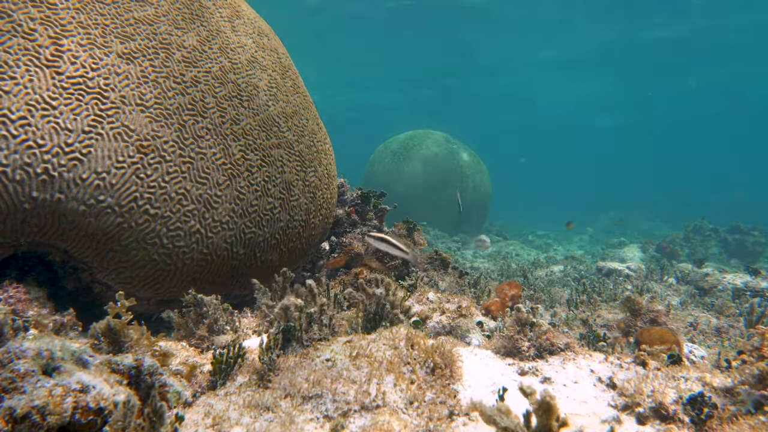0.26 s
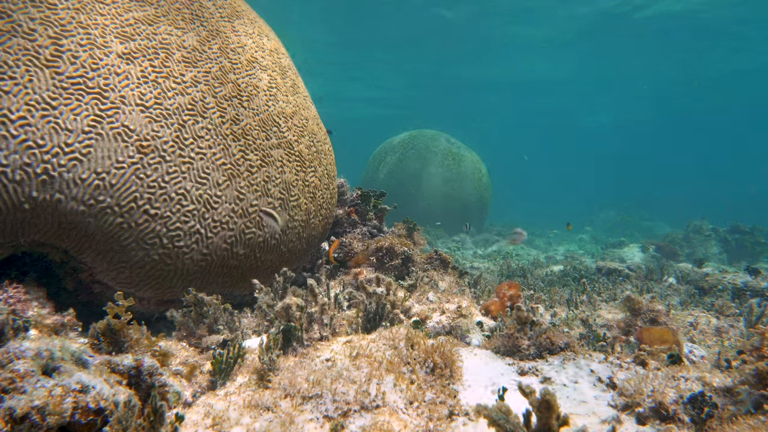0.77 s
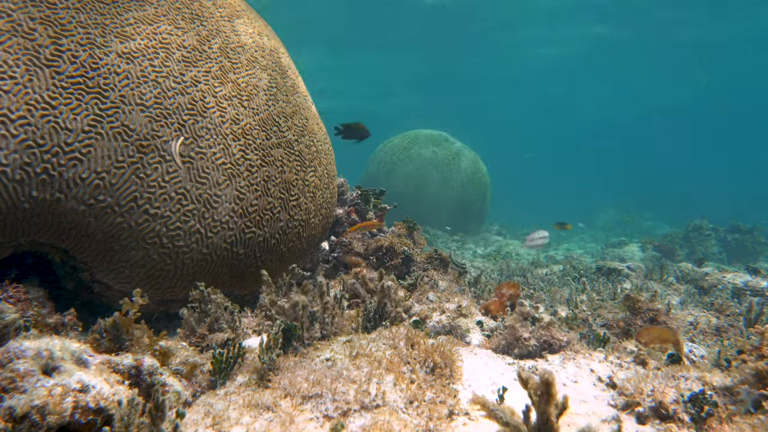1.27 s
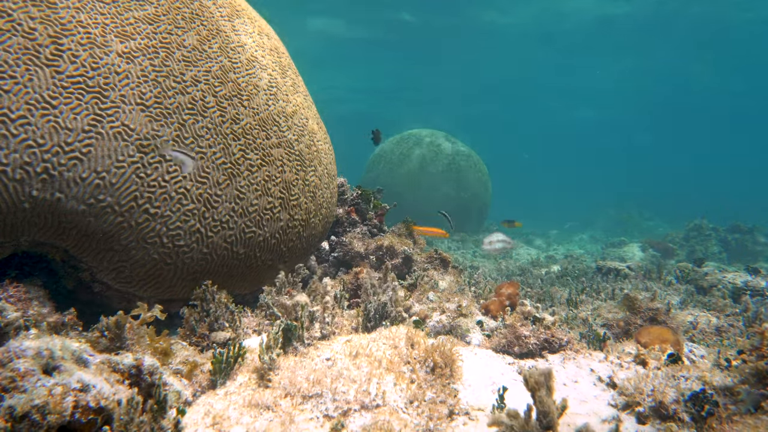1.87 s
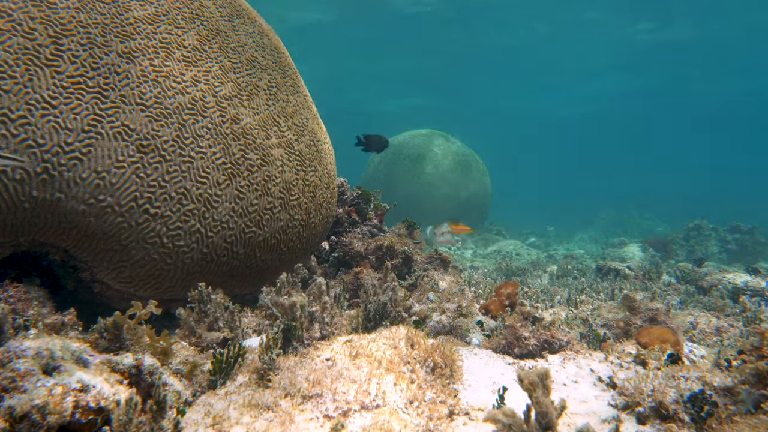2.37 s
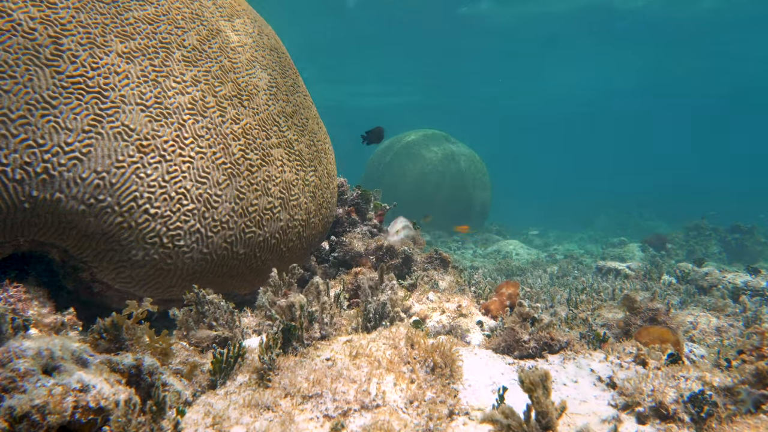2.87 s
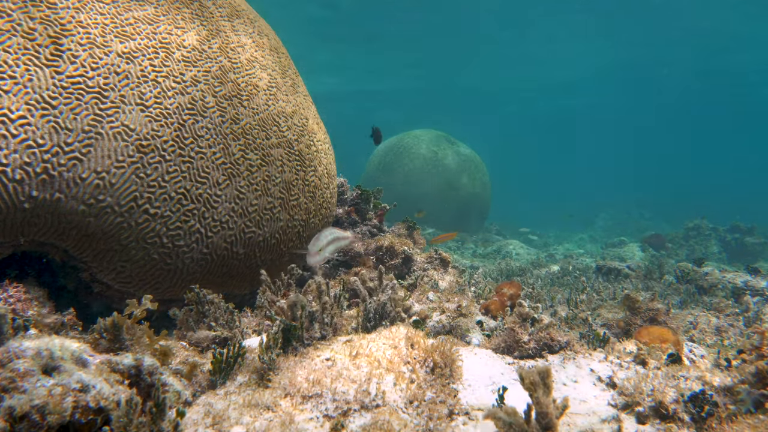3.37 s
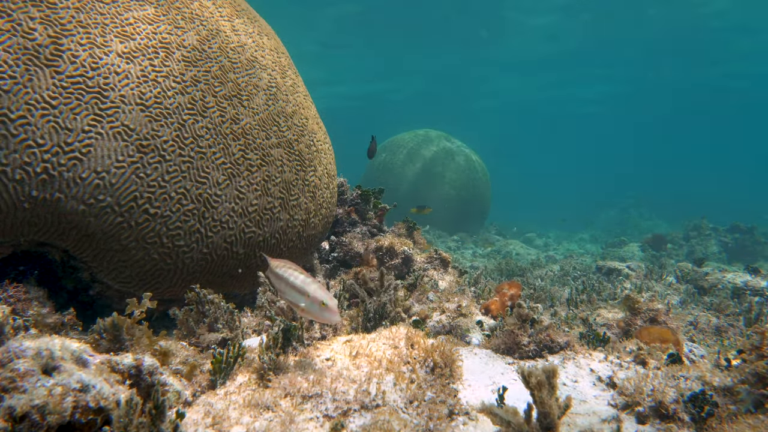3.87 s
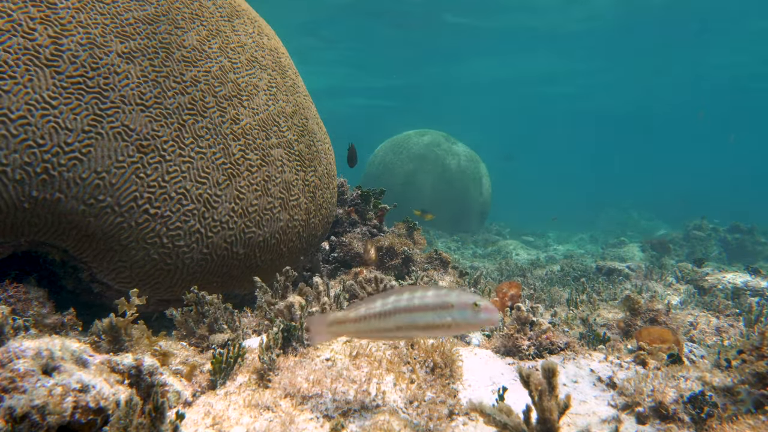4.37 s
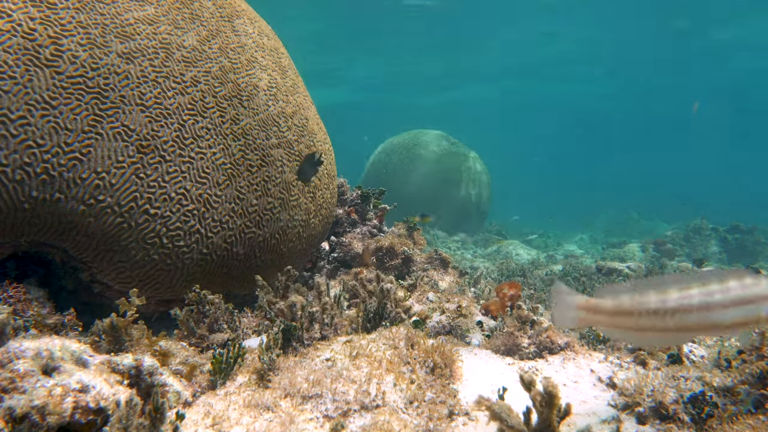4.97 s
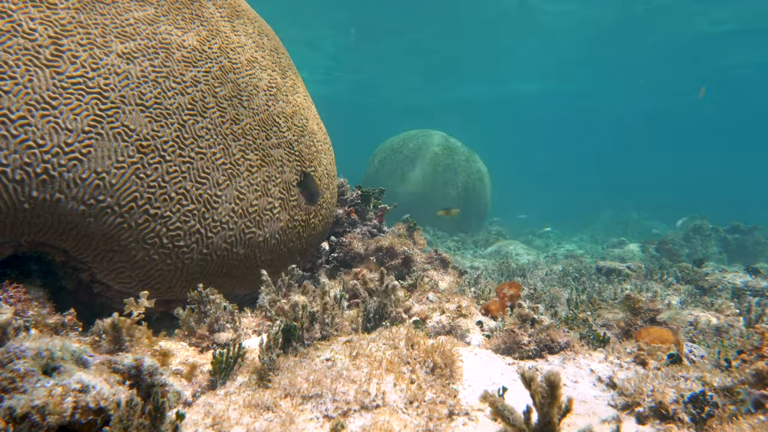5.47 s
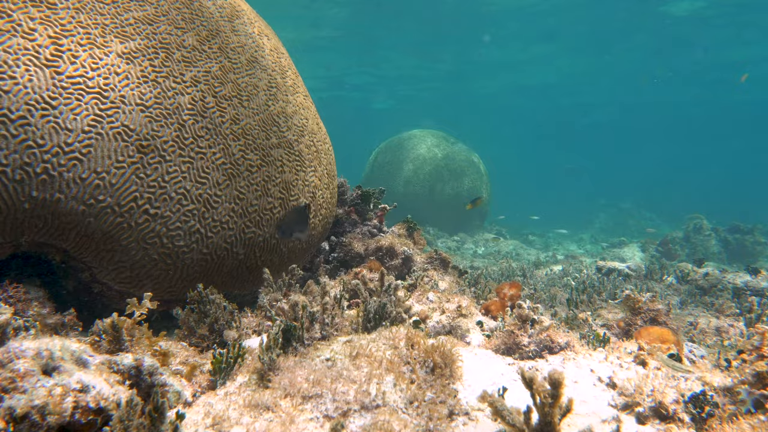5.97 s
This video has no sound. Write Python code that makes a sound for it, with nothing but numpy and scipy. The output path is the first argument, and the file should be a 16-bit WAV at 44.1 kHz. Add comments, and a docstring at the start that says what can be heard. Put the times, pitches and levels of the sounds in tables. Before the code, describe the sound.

Scattered crisp clicks crackle on a shallow reef above muffled moving water, a faint hum, small low thumps and occasional knocks.

```python
"""Snapping shrimp crackle on a shallow reef, heard by a camera in a sealed housing. Near snaps are clicks
with short noise tails; far ones blend to a hiss. Water washes through the housing resonances, over a
steady low drone and a faint hum that comes and goes. Fish drum their swim bladders in short low thumps.
Now and then a sharp knock sets the housing ringing. Two microphones feed a limiter."""
import sys
import numpy as np
from scipy import signal
from scipy.fft import rfft, irfft, next_fast_len
from scipy.io import wavfile

SR = 44100
rng = np.random.default_rng(int(sys.argv[2]) if len(sys.argv) > 2 else 0)


def master_out(mix):
    """Clip the mix to full scale and print it as 16-bit PCM to the path in sys.argv[1]."""
    frames = np.transpose(np.atleast_2d(mix))
    ceiling = np.clip(frames, -1, 1)
    pcm = np.round(ceiling * 32767).astype(np.int16)
    wavfile.write(sys.argv[1], SR, pcm)


N = 274302


def amp(db):
    """Decibels to gain."""
    return 10 ** (np.asarray(db, float) / 20)


def rms_one(x):
    """Scale to rms 1."""
    return x / np.sqrt(np.mean(x ** 2) + 1e-20)


def in_time(rows):
    """Columns of a time curve, one value per sample."""
    time_s, *columns = np.transpose(rows)
    return [np.interp(np.arange(N) / SR, time_s, column) for column in columns]


def at_hz(points, hz):
    """Spectrum interpolated over log frequency."""
    freq_hz, values = np.transpose(points)
    return np.interp(np.log(hz), np.log(freq_hz), values)


def drift(rate_hz):
    """Low-passed random curve, rms about 1."""
    hop, settle = 40, 2000
    r = np.exp(-2 * np.pi * rate_hz * hop / SR)
    slow = signal.lfilter([1], [1, -2 * r, r * r], rng.standard_normal(N // hop + settle + 2))[settle:]
    return np.interp(np.arange(N) / hop, np.arange(len(slow)), rms_one(slow))


def resonance(x, hz, width_hz, stages=1):
    """Two-pole peaks in series, unity gain on top."""
    r = np.exp(-np.pi * width_hz / SR)
    gain = (1 - r * r) / 2
    for _ in range(stages):
        x = signal.lfilter([gain, 0, -gain], [1, -2 * r * np.cos(2 * np.pi * hz / SR), r * r], x)
    return x


def ring(clicks, hz, t60_s):
    """One mode: a unit click starts a decaying unit sine."""
    r, w = amp(-60 / (t60_s * SR)), 2 * np.pi * hz / SR
    return signal.lfilter([0, np.sin(w)], [1, -2 * r * np.cos(w), r * r], clicks + 1e-18)


def band(x, low_hz, high_hz, order=2):
    """Butterworth band-pass."""
    return signal.sosfilt(signal.butter(order, [low_hz, high_hz], "band", fs=SR, output="sos"), x)


def stereo_noise(correlation):
    """White noise, partly alike in the two channels."""
    mid, side = rng.standard_normal((2, N))
    return np.sqrt(1 + correlation) * mid + np.sqrt(1 - correlation) * side * [[1], [-1]]


def low_wash(level_db):
    """Surge noise in third octaves; each band above 150 Hz swells on its own."""
    # surge spectrum: freq_hz, density_db
    spectrum = [(12, -56), (20, -25.5), (123, -13.5), (226, -0.5), (295, -4), (364, -3), (536, -19),
                (621, -55), (700, -14.5), (910, -73), (1540, -120)]
    edges_hz, out = 20 * 2 ** np.arange(0, 5.4, 1 / 3), 0
    white = [stereo_noise(correlation=.9) for _ in range(2)]
    for k, (low, high) in enumerate(zip(edges_hz, edges_hz[1:])):
        swell_db = .94 * drift(rate_hz=6.1) * (low > 150)
        out += amp(at_hz(spectrum, np.sqrt(low * high)) + swell_db) * band(white[k % 2], low, high)
    return amp(level_db) * rms_one(out)


def middle_wash(level_db):
    """Water noise through the housing's midrange resonances."""
    # housing resonances: centre_hz, nominal_width_hz, gain_db
    peaks = [(566, 56, -6.5), (717, 133, -6.5), (1019, 160, -4.5), (1144.5, 66, 4.5), (1220, 148, -9.5),
             (1450, 290, -8.5), (1490, 650, -13.5), (1817, 146, -9), (2280, 155, -17)]
    noise = stereo_noise(correlation=.14) * amp(.61 * drift(rate_hz=8.8))
    out = sum((-1) ** k * amp(db) * resonance(noise, hz, 1.46 * width_hz, stages=2)
              for k, (hz, width_hz, db) in enumerate(peaks))
    return amp(level_db) * rms_one(out)


def wash():
    """Moving water: low and middle noise rise and fall slowly."""
    # wash levels: time_s, low_db, middle_db
    levels = [(0.0, -50, -53.5), (0.62, -49, -54), (0.92, -50.5, -54), (1.39, -47.5, -52.5),
              (1.8, -50.5, -51.5), (2.32, -48.5, -53.5), (2.87, -50, -54), (3.5, -49.5, -53.5),
              (3.97, -49, -52.5), (4.28, -50, -55), (4.8, -51, -54), (5.21, -47.5, -53.5),
              (5.89, -50.5, -53), (6.22, -50, -52)]
    low_db, middle_db = in_time(levels)
    return low_wash(low_db) + middle_wash(middle_db)


def hums():
    """Two narrow noise bands: a steady low drone, a higher hum that comes and goes."""
    # higher hum: time_s, level_db
    hum_levels = [(0.0, -86), (1.19, -75), (1.63, -59), (1.94, -67), (2.11, -60.5), (2.44, -99), (3.1, -64),
                  (3.6, -95), (5.5, -86), (5.9, -70), (6.1, -53), (6.22, -77)]
    drone_db, hum_db = -60.5, in_time(hum_levels)[0]
    drone = resonance(rng.standard_normal(N), hz=230.5, width_hz=2.9, stages=2)
    hum = resonance(rng.standard_normal(N), hz=778, width_hz=22, stages=2)
    return amp(drone_db) * rms_one(drone) + amp(hum_db) * rms_one(hum)


def snap_envelope(clicks):
    """A snap swells within a millisecond and dies fast; faint reef echoes last longer."""
    direct_t60_s, echo_t60_s, echo_db = .017, .07, -13
    power = signal.lfilter([.05], [1, -.95], clicks ** 2)
    direct = signal.lfilter([1], [1, -amp(-120 / (direct_t60_s * SR))], power)
    echoes = signal.lfilter([1], [1, -amp(-120 / (echo_t60_s * SR))], power)
    return np.sqrt(direct + amp(2 * echo_db) * echoes)


def housing_treble(x):
    """Small housing resonances lift parts of the treble."""
    # treble resonances: centre_hz, width_hz, boost_db
    peaks = [(3323, 75, 7), (5220, 470, 1.5), (7100, 280, 1.5), (9400, 300, 3.5), (10300, 280, 0.5),
             (12400, 450, 5), (13800, 750, 2)]
    return x + sum((amp(db) - 1) * resonance(x, hz, width_hz) for hz, width_hz, db in peaks)


def far_crackle(level_db):
    """Countless far snaps blend to a hiss; larger ones stand out as small bursts."""
    # hiss spectrum: freq_hz, density_db
    spectrum = [(2000, 6), (3000, 1.5), (4000, -1.5), (6000, 1), (9000, -1), (13000, -0.5), (14500, -1),
                (16000, -3.5)]
    bursts_per_s = 45
    edges_hz, out = 2000 * 2 ** np.arange(0, 3.1, .5), 0
    onsets = rng.random(N) < bursts_per_s / SR
    size_db = 2 * np.minimum(rng.exponential(1, N), 3) - 3
    white = [stereo_noise(correlation=.25) for _ in range(2)]
    for k, (low, high) in enumerate(zip(edges_hz, edges_hz[1:])):
        colour_db = 5 * rng.standard_normal(N)
        bursts = snap_envelope(onsets * amp(size_db + colour_db))
        cluster_db = 1.55 * drift(rate_hz=31)   # clusters of shrimp come and go
        gain = amp(at_hz(spectrum, np.sqrt(low * high)) + cluster_db)
        out += gain * np.sqrt(1 + bursts ** 2) * band(white[k % 2], low, high)
    return amp(level_db) * rms_one(housing_treble(out))


def near_snaps():
    """Near shrimp: a sharp front, then dying noise in five bands, coloured anew for each snap."""
    # shrimp snaps: start_s, level_db, tilt_db_per_oct, hollow_db_per_oct2, left_minus_right_db
    snaps = [(0.031, -45, 4, 2, 2.0), (0.0727, -45, 3.5, 6, 1.5), (0.0875, -39.5, 1.5, 3.5, 3.0),
             (0.1082, -41, 0, -7.9, 1.0), (0.1982, -37.5, 3, -5, 0), (0.4217, -45, 1, 1, -1.0),
             (0.478, -35.5, -1.5, 0, 2), (0.5895, -43, -0.9, -6.4, 0.5), (0.696, -35.5, 6, -15, -1),
             (0.784, -42, 3, -0.4, -1.5), (0.803, -41, 2, -3, 0.5), (0.872, -44, 6, -10, 2.5),
             (0.924, -44.5, -4.5, 4.5, 0.0), (0.9908, -46, 6, -1, 1.0), (1.0647, -49, 1.3, 8, 3.5),
             (1.0838, -47, 4, -6, 2.0), (1.1253, -49, 5, 3.0, 1.0), (1.1748, -48, 8, 3, -1.0),
             (1.2054, -41, -2, 3, -2), (1.3273, -42, 0, -8.3, 1.5), (1.3603, -38.5, -5.5, 0, 0),
             (1.3812, -42, 1, 3, -1.0), (1.5087, -46.5, 9, 0, 2.0), (1.6084, -43, -8, -4, -1.0),
             (1.6204, -46, 0.4, -0.7, 1), (1.6287, -35, -1, -9, -1), (1.6584, -46, 2.5, -0.2, 0.0),
             (1.6724, -32, 1.5, -4, 2), (1.7148, -49, 1.5, 9.5, -1), (1.7274, -47, 1.7, 1.5, -0.5),
             (1.7749, -49, 4.7, 2, 1.0), (1.7878, -36, -1.5, 2, 0), (1.8064, -40.5, 0, 0, 0),
             (1.8453, -41.5, 2, -5, 5), (1.8803, -39.5, -3, -4, -2.0), (1.9157, -44, -1.6, -1.0, 3.0),
             (1.9244, -39, -5, -1.5, 0.5), (1.9381, -47, 0.5, 1, 0.0), (2.0656, -40.5, -2, 0.5, -1),
             (2.0938, -35.5, -3, -0.5, -1.5), (2.2265, -42, -12, -3.5, -1), (2.2825, -45, -6.8, 4.5, 0.5),
             (2.2957, -43, 4, 1.1, 1.5), (2.3168, -41.5, 2, -2.3, 1.0), (2.3577, -52, 6, 5.2, 3.0),
             (2.3896, -44, 5, 1, 1), (2.4162, -51, 6, 0.1, 0.5), (2.5042, -44, 0, -2, 2.5),
             (2.5138, -49, 0.6, 1, -0.5), (2.5261, -46.5, 11, 1, -0.5), (2.569, -38.5, -2, 0, 2.0),
             (2.5924, -51, -5.2, 7.5, -1), (2.6253, -41.5, 1, 4, 1.0), (2.6917, -40, 1.4, -2, 0),
             (2.8333, -39, 0, -19, -2.5), (2.8518, -42.5, 4, -8, 1.5), (2.9242, -46, 5.6, -1, 2.5),
             (2.9835, -48, 6, -3.2, 1), (3.0542, -37, 0.5, 2, 2.0), (3.085, -37, 3, 5, 1),
             (3.1312, -35, 0.5, 3, 1), (3.1564, -46, 4, 5, 3.5), (3.1986, -40.5, -5, 2.5, 0),
             (3.5322, -47, 9, 1, -1.0), (3.609, -36.5, -6, -3, 0), (3.6462, -45, -4, 0.0, -1.5),
             (3.6694, -45.5, -1, -1, 2.5), (3.6854, -48, -2.8, -7, 1.5), (3.8018, -30.5, -7, 1, -1),
             (3.9295, -36, 1, 4, 0), (3.952, -36, -3.5, 2, -1), (4.0763, -44.5, -3, 5.5, -3.0),
             (4.1775, -37.5, 7, -8, -1), (4.2224, -45, 4, -6.4, 0.5), (4.404, -43.5, 2, -5.1, 0.5),
             (4.448, -46, 4, -2.3, 2.5), (4.4678, -40.5, -3, 4.5, -1.0), (4.4804, -44, 3.0, -2.4, 1.5),
             (4.5632, -44, -2, 1.2, 2.5), (4.7007, -39.5, -2.5, 2.2, -3), (4.8594, -32, 7.5, -8, -2),
             (4.8956, -40, -6, -4, 1.0), (4.9226, -43.5, -6.8, 2, -1.0), (4.939, -47, 6, 4.3, 2.0),
             (4.9651, -49, 6, -1, 0.5), (4.9837, -36.5, -6.5, 1.6, -4), (4.9964, -40.5, -4.6, 1, -3),
             (5.0543, -47, 0.2, 6.5, 0.5), (5.1932, -40, -5, 1.2, 0.5), (5.2476, -45, 0.4, 9.5, -2),
             (5.2964, -59, 6.6, 7.1, -1.5), (5.32, -39.5, -1, 2, -1.0), (5.4142, -40, 1, -10, -3.0),
             (5.4369, -53, 1.6, 5.7, 3.5), (5.4453, -44.5, -5, 4, -1.5), (5.491, -46, -1, 4, 1.5),
             (5.5334, -40, -2, -2, 1.0), (5.6124, -48, 2, 2.1, -2.0), (5.6253, -54, 5.0, 3.7, 2.0),
             (5.6925, -38.5, -0.8, 0, -3), (5.7392, -56, 5, 7.8, -1.0), (5.7519, -45.5, -4.0, 2.2, 4),
             (5.7805, -46, 7, 2, 2.0), (5.8304, -47, 5, 1, 2.5), (5.9025, -37, -4.3, -2.8, 1),
             (5.9124, -49, 1.7, -0.7, 3.5), (5.9438, -28.5, -3.5, -2, 0.5), (5.9602, -50, 5, 10, -0.5),
             (5.985, -42, -2.0, -1.7, 0.5), (6.0405, -37.5, -6, -4, 3), (6.0972, -45, 1, 7.5, 3.0),
             (6.11, -37, -5, -4.5, 2), (6.1894, -39.5, -1.5, 1, 1.0), (6.2034, -43, 3.7, -1.9, 1.5),
             (6.215, -43, -6, -4.1, 1.5)]
    # spectrum common to all snaps: freq_hz, gain_db
    spectrum = [(2800, -22), (4600, -17), (7500, -13), (11000, -12.5), (15000, -15.5)]
    # snap bands: edge_hz
    edges_hz = [2200, 3600, 6000, 9500, 13000, 17000]
    start_s, level_db, tilt, hollow, pan_db = np.transpose(snaps)
    onsets, out = np.round(start_s * SR).astype(int), 0
    pivot_hz, front_gain = 7000, 3.8
    scatter_db = 1.5 * rng.standard_normal((len(snaps), 5))
    for k, (low, high) in enumerate(zip(edges_hz, edges_hz[1:])):
        centre_hz = np.sqrt(low * high)
        octaves = np.log2(centre_hz / pivot_hz)
        colour_db = at_hz(spectrum, centre_hz) + tilt * octaves + hollow * octaves ** 2 + scatter_db[:, k]
        clicks = np.zeros((2, N))
        clicks[:, onsets] = amp(level_db + colour_db + pan_db * [[.5], [-.5]])
        burst = front_gain * clicks + snap_envelope(clicks) * stereo_noise(correlation=.033)
        out += band(band(burst, low, high), low, high) * np.sqrt(SR / 2 / (high - low))
    return housing_treble(out)


def fish_thumps():
    """A drummed swim bladder: a few cycles that swell fast and fade."""
    # thumps: start_s, level_db, pitch_hz, half_length_cycles
    thumps = [(0.369, -35, 310, 5.2), (0.387, -34.5, 308, 2.6), (0.404, -35, 276, 1.6),
              (0.431, -47, 264, 5.4), (0.444, -41, 313, 5.4), (0.581, -39, 355, 8), (0.798, -40, 260, 4),
              (1.088, -41, 356, 4.5), (1.131, -40, 380, 5), (1.239, -45, 233, 8.4),
              (1.455, -39.5, 266, 9.2), (1.559, -41, 267, 3.1), (1.967, -44.5, 334, 14),
              (2.058, -41.5, 350, 4.3), (2.1, -35, 405, 5.4), (2.152, -39, 288, 4.6), (2.271, -37, 305, 5),
              (2.358, -43, 302, 8), (2.544, -40.5, 313, 6.9), (2.806, -43.5, 340, 4.2),
              (2.857, -35, 335, 3.9), (3.251, -30.5, 352, 3.1), (3.415, -38.5, 397, 5.8),
              (3.468, -39.5, 374, 4.5), (3.628, -38, 388, 5.4), (3.95, -45, 215, 7.9),
              (4.166, -34.5, 381, 4.5), (4.684, -27, 372, 4.6), (5.004, -35.5, 347, 3.7),
              (5.028, -36, 330, 4.2), (5.057, -41, 322, 6.3), (5.069, -37.5, 365, 7.4),
              (5.104, -35.5, 285, 4), (5.181, -35.5, 370, 5.5), (5.199, -39, 353, 8.8),
              (5.289, -43, 228, 12), (5.352, -41.5, 270, 6.2), (5.441, -36.5, 390, 3.8),
              (5.521, -37.5, 403, 6.9), (5.591, -49, 263, 5.1), (5.733, -40.5, 332, 2.7),
              (6.143, -38, 272, 3)]
    out = np.zeros(N + SR)
    for start_s, level_db, pitch_hz, half_length in thumps:
        cycles = np.arange(int(2 * half_length * SR / pitch_hz)) * pitch_hz / SR
        age = cycles / half_length
        swell = 4.82 * age * np.exp(1 - 4.03 * age)
        onset = round(start_s * SR)
        out[onset:onset + len(cycles)] += amp(level_db) * swell * np.sin(2 * np.pi * cycles)
    return out[:N]


def housing_knocks():
    """A springy contact rings every housing mode, by where it lands and how hard it is."""
    # knocks: start_s, level_db, place (0 wall, 1 lens port), tilt_db_per_oct, hollow_db_per_oct2
    knocks = [(0.924, -24, 0.048, -0.5, 1.3), (2.569, -48.5, 0.33, 9.5, 1), (3.084, -23.5, .01, -2.5, .3),
              (3.199, -24.5, .1, -3, 0.4), (3.669, -33, 0.11, -4, 2), (3.802, -10.5, 0.93, -0.9, 1.3),
              (4.076, -29, 0.065, 0.5, 1), (4.47, -30.5, 0.1, 0, 1.6), (4.923, -31.5, 0.1, 0, 1.4),
              (5.245, -40.5, 0.57, 1.5, 1.5), (5.318, -44.5, 0.45, 2.5, -1),
              (5.944, -14.5, 0.0091, 0, -1.5)]
    # housing modes: freq_hz, wall_struck_db, port_struck_db, t60_s
    modes = [(324, -16, -48, 0.025), (388.5, -9, -14, 0.032), (565, -12, -21, 0.028),
             (707, -29, -29, 0.045), (787, -30, -25, 0.052), (910, -35, -19, 0.089),
             (989, -28, -8.5, 0.038), (1071, -26, -9, 0.055), (1248, -15, -16, .03),
             (1620, -19, -30, 0.018), (1870, -26, -22, 0.037), (2220, -46, -35, 0.022),
             (2284, -33, -24, 0.04), (662, -56, -45, .65), (775, -53, -45, .65), (1249, -58, -47, .65),
             (1793, -62, -54, .45), (1922, -60, -47, .55)]
    # contact push, pull, push, half a mode cycle apart: relative_force
    pushes = [.5, -1, .7]
    start_s, level_db, place, tilt, hollow = np.transpose(knocks)
    onsets, out = np.round(start_s * SR).astype(int), 0
    pivot_hz = 600
    scatter_db = 1.5 * rng.standard_normal((len(knocks), len(modes)))
    for k, (hz, wall_db, port_db, t60_s) in enumerate(modes):
        octaves = np.log2(hz / pivot_hz)
        place_db = wall_db + place * (port_db - wall_db)
        colour_db = tilt * octaves + hollow * octaves ** 2 + scatter_db[:, k]
        clicks = np.zeros(N)
        for half_cycle, push in enumerate(pushes, start=-1):
            clicks[onsets + round(half_cycle * SR / hz / 2)] = push * amp(level_db + place_db + colour_db)
        out += ring(clicks, hz, t60_s)
    return band(out, 240, 2550, order=5)   # the wall passes neither deep bass nor treble


def two_microphones(x):
    """Each microphone sits on its own part of the wall: level and delay differ with frequency."""
    # housing-to-microphone paths: freq_hz, left_minus_right_db, left_lag_ms
    paths = [(300, .5, 0), (400, -.3, -.04), (600, -.4, 0), (780, -5, -.05), (880, -2, 0), (1000, 0, .13),
             (1110, -3, .12), (1240, 1.5, .02), (1620, -2.5, -.08), (1880, -2.5, -.1), (2340, 1, -.04),
             (3300, 3.5, .05), (5000, -5, -.04), (6000, 0, 0), (7100, 2.5, .015), (9000, -1, -.01),
             (12400, 3, 0), (15000, 0, 0)]
    size = next_fast_len(N + 2000)
    hz = np.maximum(np.arange(size // 2 + 1) * SR / size, 1)
    pan_db = at_hz(np.array(paths)[:, [0, 1]], hz)
    lag_s = at_hz(np.array(paths)[:, [0, 2]], hz) / 1000
    side = np.array([[.5], [-.5]])
    response = amp(side * pan_db) * np.exp(-2j * np.pi * hz * side * lag_s)
    return irfft(rfft(x, size) * response, size)[:, :N]


def scene():
    """Water, animals and knocks, heard through the housing."""
    background = wash() + hums()
    shrimp = far_crackle(level_db=-60) + near_snaps()
    return two_microphones(background + shrimp + fish_thumps() + housing_knocks())


def record(dry):
    """A limiter ducks after loud peaks and recovers; a steep low-pass cuts the top."""
    threshold_db, ratio, attack_s, release_db_per_s = -15, 5, .005, 40
    cutoff_hz = 15900
    peak_db = 20 * np.log10(np.abs(dry).max(axis=0) + 1e-9)
    cut_db = np.maximum(peak_db - threshold_db, 0) * (1 - 1 / ratio)
    release_db = release_db_per_s * np.arange(N) / SR
    held_db = np.maximum.accumulate(cut_db + release_db) - release_db
    r = np.exp(-1 / (attack_s * SR))
    ducked = dry * amp(-signal.lfilter([1 - r], [1, -r], held_db))
    return signal.sosfilt(signal.ellip(10, 1, 70, cutoff_hz, fs=SR, output="sos"), ducked)


dry = scene()
out = record(dry)
master_out(out)
```